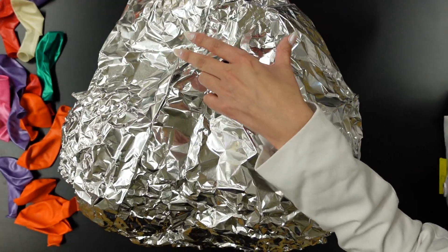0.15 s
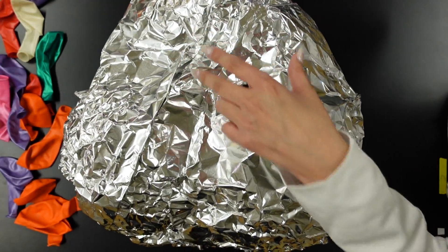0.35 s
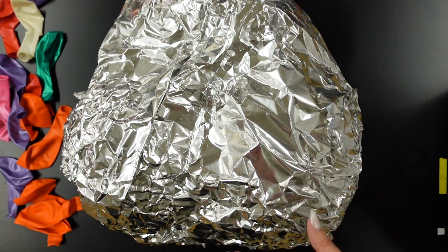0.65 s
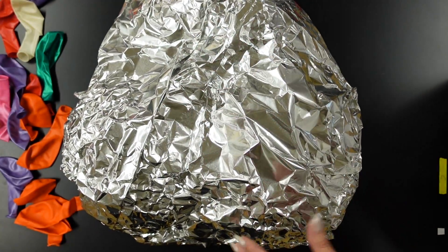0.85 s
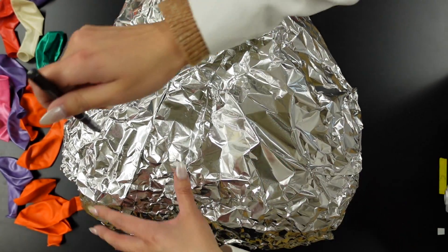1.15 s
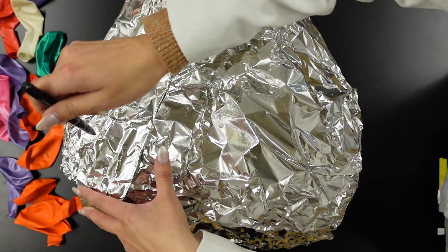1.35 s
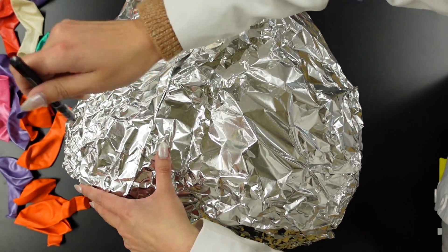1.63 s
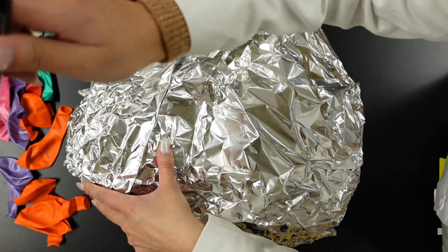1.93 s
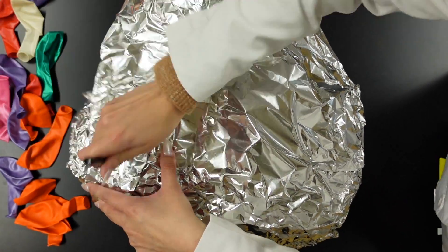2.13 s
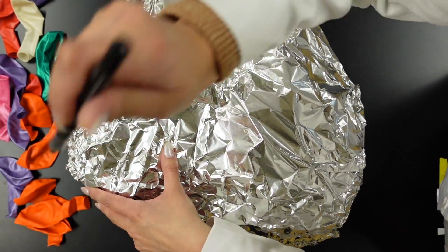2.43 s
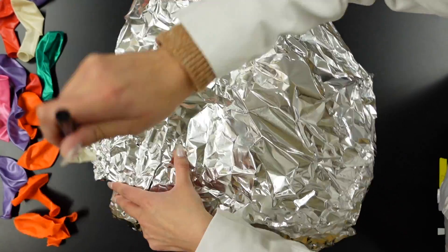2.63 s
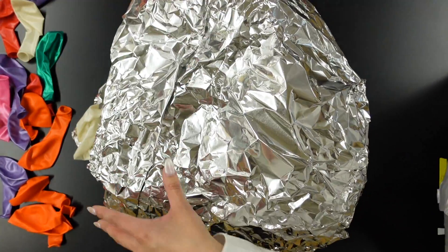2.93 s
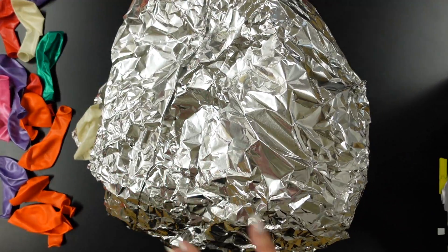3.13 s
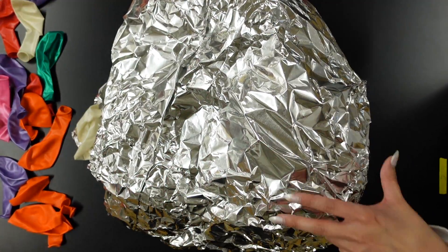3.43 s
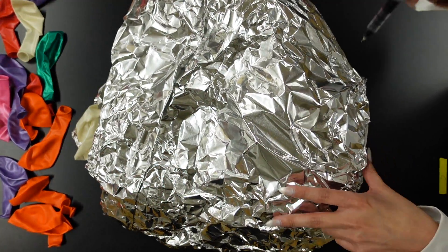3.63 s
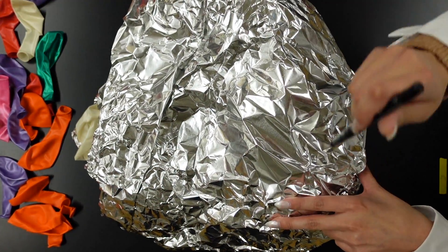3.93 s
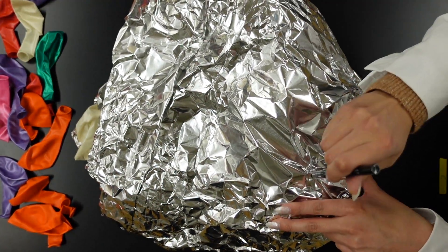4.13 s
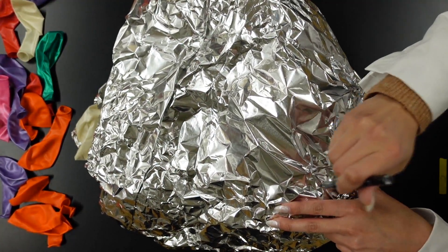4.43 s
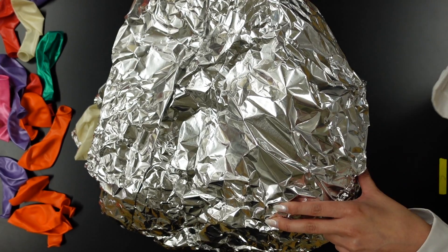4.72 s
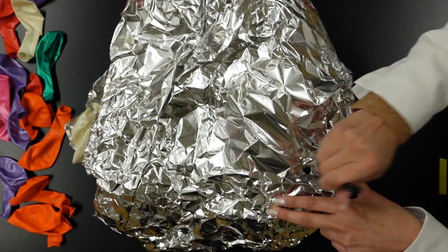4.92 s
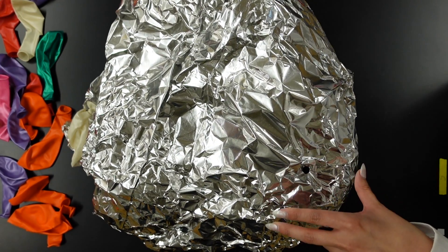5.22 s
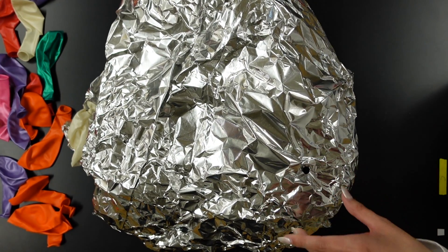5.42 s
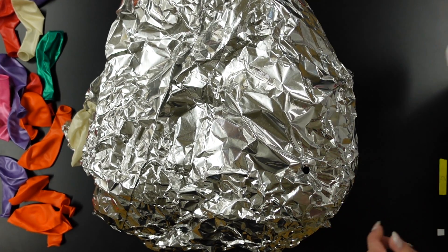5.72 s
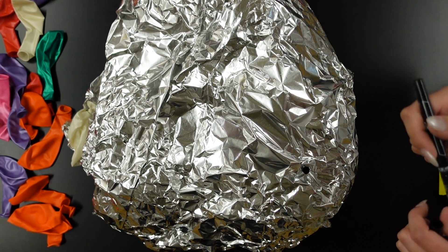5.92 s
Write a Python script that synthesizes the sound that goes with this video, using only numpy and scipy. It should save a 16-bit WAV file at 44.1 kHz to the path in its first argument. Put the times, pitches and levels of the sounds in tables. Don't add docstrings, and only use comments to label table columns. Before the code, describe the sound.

Balloons inside a crumpled foil shell burst in sharp, overloaded bangs with hollow air booms, while hands rustle and snap the foil in a small room.

```python
import sys
import numpy as np
from scipy import signal
from scipy.io import wavfile
from scipy.ndimage import uniform_filter1d

SR = 44100
rng = np.random.default_rng(int(sys.argv[2]) if len(sys.argv) > 2 else 0)


def linear_from_db(decibels):
    return 10 ** (np.asarray(decibels, float) / 20)


def wav_record(signal):
    frames = np.transpose(np.atleast_2d(signal))
    bounded = np.clip(frames, -1, 1)
    quanta = np.round(bounded * 32767).astype(np.int16)
    wavfile.write(sys.argv[1], SR, quanta)


N = 267510
STEP = 16

# start_s, level_db, slap_hz, length_s, limiter_dip_db
BURSTS = [(2.1708, -8, 1350, .0035, 0), (2.1742, -6, 600, .003, 14), (2.2313, -11, 560, .003, 1),
          (2.5613, -7, 520, .003, 3), (2.5645, -10, 1500, .004, 4), (2.5878, -3, 520, .0022, 4),
          (2.6018, -3, 330, .003, 4), (4.8826, -14, 900, .0025, 0), (4.8848, -4, 700, .0015, 7),
          (4.895, -5, 800, .0025, 0), (4.8978, -6, 420, .0035, 12)]
# start_s, hold_s, foil_db, boom_db, fall_db_per_s
RUSHES = [
    (-.13, 0.16, -22.5, -16, 215),
    (0.002, 0.004, -44, -16, 603),
    (2.172, 0.05, -18, -18, 168),
    (2.598, 0.23, -20.5, -14, 205),
    (4.886, 0.24, -21.5, -12.5, 174),
]
# frequency_hz, level_db (per Hz)
FOIL_COLOUR = [(350, -14), (600, 1.5), (643, -7.5), (709, -10), (770, -13.5), (1090, -7), (4070, -15.5),
               (5910, -18.5), (7700, -14.5), (9740, -24.5), (15000, -25.5), (15800, -48.5), (16500, -53)]


def evened(x):
    return x / np.sqrt(np.mean(x ** 2) + 1e-20)


def read(points, hz):
    f, value = np.transpose(points)
    return np.interp(np.log(hz + 1), np.log(f + 1), value)


def coloured(x, points):
    hz = np.abs(np.fft.fftfreq(8192, 1 / SR))
    log_gain = np.log(linear_from_db(np.maximum(read(points, hz), -100)))
    taps = np.fft.ifft(np.exp(np.conj(signal.hilbert(log_gain)))).real[:4096]
    return evened(signal.oaconvolve(x, taps)[:len(x)])


def band(x, lo_hz, hi_hz, order=2):
    sos = signal.butter(order, [lo_hz, min(hi_hz, .45 * SR)], "band", fs=SR, output="sos")
    return signal.sosfilt(sos, x)


def resonate(x, hz, width_hz):
    turn = np.exp(2j * np.pi * np.cumsum(hz * np.ones(len(x))) / SR)
    r = np.exp(-np.pi * width_hz / SR)
    return 2 * (turn * signal.lfilter([1 - r], [1, -r], x / turn)).real


def resonate_twice(x, hz, width_hz):
    return evened(resonate(resonate(x, hz, width_hz), hz, width_hz))


def add(mix, s, sound):
    part = mix[round(s * SR):][:len(sound)]
    part += sound[:len(part)]


def summed(levels_db):
    gain = np.sqrt(sum(linear_from_db(2 * db) for db in levels_db))
    return np.interp(np.arange(N), np.arange(0, N, STEP), gain)


def bursts():
    tear_db, tear_hz = -12.5, 800
    out, t = np.zeros(N), np.arange(2000) / SR
    noise = rng.standard_normal((len(BURSTS), 2, len(t)))
    for (s, db, hz, length, _), (a, b) in zip(BURSTS, noise):
        glide = (1.15 - 0.37 * t / length).clip(.5)
        wander = 1 + 0.41 * evened(uniform_filter1d(a, 30))
        slap = -np.sin(2 * np.pi * np.cumsum(hz * glide * wander) / SR)
        tear = linear_from_db(tear_db - db) * min(hz / tear_hz, 1) * coloured(b, FOIL_COLOUR) * np.exp(-t / (2 * length))
        add(out, s, linear_from_db(db) * (slap + tear) * np.exp(-np.maximum(t - length, 0) / .001))
    return band(out, 130, 17000, order=1)


def limiter_dip():
    t, dip_db = np.arange(N) / SR, np.zeros(N)
    for s, _, _, length, depth_db in BURSTS:
        since = t - s - length
        dip_db = np.maximum(dip_db, depth_db * np.exp(-since.clip(0) / .016) * (since > 0))
    return linear_from_db(-dip_db)


def rush(s, hold_s, fall_db_per_s):
    swell_db, swell_s = -3.5, 0.088
    since, knee = np.arange(0, N, STEP) / SR - s, 0.23 * hold_s
    swell = swell_db * np.exp(-since.clip(0) / swell_s)
    fall = fall_db_per_s * knee * np.logaddexp(0, (since - hold_s) / knee)
    return np.where(since >= 0, swell - fall, -150)


def boom():
    # frequency_hz, level_db (per Hz)
    deep_colour = [(41, -30), (70, -27.5), (92, -26), (249, 1.5), (332, 2.5), (399, 4.5), (648, -19.5),
                   (692, -9), (749, -8.5), (1220, -31.5), (1600, -20.5), (2080, -36.5), (3520, -120)]
    # frequency_hz, level_db (per Hz)
    touch_colour = [(150, -38.5), (230, -18), (330, -8.5), (450, 9.5), (600, 6), (800, 1), (1100, -30.5),
                    (1800, -45.5)]
    boom_hold, boom_fall = 0.79, 0.88
    touch_db, touch_per_db, touch_per_bright = -8, 0.17, -0.57
    ring_hz, ring_width_hz, ring_db, ring_fall_db_per_s = 549, 72, -18, 90

    lumps = crackle(280, 2.6, 0.02, 0.6)
    airs = []
    for s, hold, _, db, fall in RUSHES:
        depth = np.clip(0.48 + 1.61 * hold, .01, .99)
        airs.append((db + rush(s, boom_hold * hold, boom_fall * fall), depth))
    deep = summed(level + 20 * np.log10(depth) for level, depth in airs)

    light_levels = [level + 10 * np.log10(1 - depth ** 2) for level, depth in airs]
    for level, db, bright_db in presses():
        touch = touch_db + touch_per_db * (db + 31.5) + touch_per_bright * (bright_db + 9)
        light_levels.append(level + touch)
    light = summed(light_levels)

    ring = summed(db + ring_db + rush(s, boom_hold * hold, ring_fall_db_per_s)
                  for s, hold, _, db, _ in RUSHES)
    hollow = resonate_twice(lumps, ring_hz, ring_width_hz)
    return deep * coloured(lumps, deep_colour) + light * coloured(lumps[::-1], touch_colour) + ring * hollow


def crackle(per_s, spread_db, smear_s, hiss):
    size = linear_from_db(spread_db * np.minimum(rng.exponential(1, N), 5)) * (rng.random(N) < per_s / SR)
    smear = np.sqrt(signal.lfilter([1], [1, -np.exp(-1 / (smear_s * SR))], size ** 2))
    return (evened(smear) + hiss) * rng.standard_normal(N)


def patches(count):
    cracks_per_s = 1500
    pitches = np.geomspace(800, 15000, count) * rng.uniform(0.98, 1.05, count)
    rings = (band(crackle(cracks_per_s / count, 4.2, .009, 0.85), .975 * hz, 1.025 * hz, order=1)
             for hz in pitches)
    return evened(sum(rings))


def gesture(s, rise_s, hold_s, sag_db_per_s, fall_db_per_s):
    rise_from_db = -37.5
    since = np.arange(0, N, STEP) / SR - s
    held = -sag_db_per_s * since.clip(0, hold_s) - fall_db_per_s * (since - hold_s).clip(0)
    return held + rise_from_db * (-since).clip(0) / max(rise_s, .002)


def presses():
    # full_s, rise_s, hold_s, level_db, brightness_db
    press_rows = [(0.277, 0.083, 0.19, -38.5, -3.5), (0.418, 0.0058, 0.1, -41.5, -6.5),
                  (0.648, 0.053, 0.012, -41, -14), (1.01, 0.26, 0.23, -60.5, -2.5),
                  (1.393, 0.023, 0.063, -50.5, 3), (1.415, 0.0033, 0.054, -40, -23),
                  (1.433, .015, .2, -43, -24), (1.496, .03, 0.033, -33.5, -18.5),
                  (1.567, .01, 0.065, -38, -26), (1.662, 0.0046, 0.074, -33, -9.5),
                  (1.783, 0.087, 0.08, -32, -5.5), (1.892, .005, 0.0069, -30.5, -12.5),
                  (1.984, 0.0092, 0.14, -41, -12.5), (2.15, 0.0059, 0.026, -41.5, -7),
                  (2.49, .02, 0.05, -55.5, -10), (2.54, 0.0035, 0.05, -22.5, -5),
                  (0.65, .02, 0.037, -58, -28), (3.022, 0.046, 0.032, -52, -24),
                  (3.576, 0.043, .2, -27, -4.5), (3.8, 0.046, .1, -33, -6.5),
                   (3.845, 0.022, 0.032, -42, -38), (3.928, 0.066, .05, -33, -10),
                   (3.991, .004, .02, -40.5, -6), (4.155, 0.15, .03, -44.5, -5.5),
                   (4.238, 0.18, .04, -45, -9), (4.39, 0.12, .03, -55, -32), (4.46, 0.08, .03, -46.5, -9),
                   (4.604, 0.09, .04, -50, -9.5), (4.72, .03, .05, -60, -9.5),
                   (4.807, 0.0096, .025, -37.5, -11.5), (5.178, 0.012, .08, -32, -12),
                   (5.35, 0.0098, .01, -54, -18), (5.395, 0.0073, .02, -44, -14.5)]
    sag_db_per_s, fall_db_per_s = 39, 291
    return [(db + gesture(s, rise, hold, sag_db_per_s, fall_db_per_s), db, bright_db)
            for s, rise, hold, db, bright_db in press_rows]


def foil():
    body_per_db = 0.52
    treble_fall = 1.04
    # low_hz, high_hz, press_db, press_db per dB of brightness, rush_db, fall ratio
    bands = [(690, 1500, -10, -0.28, -3, 1),
             (1500, 5000, 0, 0, 0, 1),
             (5000, 10000, 0, 1, -4.5, treble_fall),
             (10000, 17000, -7, 1.9, -14.5, treble_fall ** 2)]
    sheet = coloured(0.88 * evened(crackle(300, 1.0, 0.015, 0.89)) + patches(count=22), FOIL_COLOUR)
    hands, out = presses(), np.zeros(N)
    for lo_hz, hi_hz, base_db, per_bright, rush_db, faster in bands:
        per_db = body_per_db if lo_hz < 1000 else 0
        levels = [level + base_db + per_bright * bright_db + per_db * (db + 33.5)
                  for level, db, bright_db in hands]
        levels += [db + rush_db + rush(s, hold, faster * fall) for s, hold, db, _, fall in RUSHES]
        out += summed(levels) * evened(band(sheet, lo_hz, hi_hz, order=3))
    return out


def snaps():
    # start_s, peak_db, pitch_hz, broad_crack_share (0-1)
    snaps_single = [(.2239, -37.5, 7750, .7), (.2584, -28, 4100, 0.44), (.2733, -23, 4170, 0.4),
                    (.35, -28, 5740, 0.75), (.411, -18.5, 3800, 0.5), (.4494, -25.5, 2740, .3),
                    (.4758, -25.5, 3430, 0.42), (.6482, -33.5, 3400, 0.6), (1.4167, -18, 1380, 0.65),
                    (1.4563, -21, 2180, 0.7), (1.474, -11.5, 7500, 0.33), (1.502, -28, 1420, 0.95),
                    (1.5128, -18, 2050, .48), (1.559, -21.5, 2090, .6), (1.5888, -15.5, 1330, 0.84),
                    (1.6083, -23.5, 1300, 0.2), (1.6174, -9, 4430, 0.6), (1.6691, -21, 1350, 0.2),
                    (1.6828, -9.5, 3200, 0.72), (1.7589, -23.5, 2250, .03), (1.7943, -21, 1670, 1),
                    (1.8396, -16.5, 3950, 0.07), (1.8933, -14, 2200, 0.42), (1.938, -28, 1810, 0.77),
                    (1.9854, -24, 1470, 0.36), (2.024, -27.5, 2300, 0.31), (2.1365, -16, 3740, 0.39),
                    (2.484, -39, 2700, 0), (2.5416, -14, 1380, .4), (3.0215, -34, 1500, 0.1),
                    (3.1426, -42.5, 1346, 0.38), (3.5646, -20, 2060, 0.95), (3.5794, -11.5, 3000, 0.71),
                   (3.6496, -13.5, 1500, 0.46), (3.7, -10, 3030, 0.099), (3.7953, -16.5, 2120, 0.61),
                   (3.8292, -25, 3940, .1), (3.924, -18, 1430, 0.47), (3.9392, -16, 1510, 0.34),
                   (3.9925, -19.5, 6060, .03), (4.152, -34.5, 7800, 0.18), (4.3893, -38, 2470, 0.58),
                   (4.4303, -37, 5000, .03), (4.4533, -34, 2400, 0.54), (4.599, -34, 4440, 0.29),
                   (4.635, -35.5, 3030, .4), (4.808, -26.5, 1710, 0.68), (4.8827, -5.5, 4830, 0.86),
                   (5.1731, -9.5, 1210, 0.48), (5.2334, -16.5, 1730, .24), (5.2593, -24, 1840, .03),
                   (5.347, -31, 1710, .03), (5.3961, -23.5, 2210, 0.26)]
    # start_s, peak_db, pitch_hz, broad_crack_share (0-1)
    snaps_flung = [
        (.04, -20, 1810, 0.5),
        (0.086, -28, 5000, 0.5),
        (2.208, -15, 900, 0.1),
        (2.24, -16, 8850, 0),
        (2.265, -22, 900, .3),
        (2.635, -9, 905, 0.85),
        (2.75, -10.5, 3500, 0.56),
        (2.84, -19.5, 9000, 0.75),
        (4.937, -15.5, 4000, .7),
    ]
    # start_s, peak_db, pitch_hz, broad_crack_share (0-1)
    snaps_broad = [(1.47, -24.5, 390, 0.07), (1.515, -25, 400, 0.1), (1.615, -29, 385, .03),
                   (3.65, -23, 720, .03), (3.69, -25, 760, .03), (3.76, -24, 780, .03),
                   (3.94, -20, 820, .03), (4.215, -35.5, 1570, .05), (4.256, -38.5, 1550, 0.1),
                   (4.39, -39, 844, 0.1), (4.815, -34, 620, .03)]
    ring_t60_s, rattle_t60_s = 0.049, .21
    out, t = np.zeros(N), np.arange(7000) / SR
    rows = snaps_single + snaps_flung + snaps_broad
    noise = rng.standard_normal((len(rows), len(t)))
    for (s, db, hz, broad), n in zip(rows, noise):
        broad = np.clip(broad, 0, 1)
        patch = resonate_twice(n, hz, .33 * hz)
        top_hz = 2 * hz + 17000 * broad ** 2
        crack = evened(band(coloured(n, FOIL_COLOUR), 0.8 * hz, top_hz))
        flip = 0.64 * np.exp(-t / .0015) * linear_from_db(min(db + 14, 0) / 2)
        rattle_db = -7 - 0.39 * (db + 20.5)
        shape = flip + linear_from_db(-60 * t / ring_t60_s) + linear_from_db(rattle_db - 60 * t / rattle_t60_s)
        rise_s = 0.0002 * linear_from_db(1.66 * max(-19 - db, 0))
        snap = ((1 - broad) * patch + broad * crack) * shape * np.minimum(t / rise_s, 1)
        add(out, s, linear_from_db(db - 8.5) * snap)
    return out


def table():
    # start_s, hold_s, thump_db, wobble_db
    rock = [(0.0, .05, -48, -48), (0.076, 0.12, -47.5, -69), (0.417, 0.072, -58.5, -75),
            (2.155, .06, -47, -42), (2.29, .2, -72, -45.5), (2.56, .02, -26, -41), (2.707, 0.11, -50, -40),
            (2.87, 0.31, -78.5, -48.5), (4.89, .02, -51.5, -46.5), (5.03, 0.11, -55, -57),
            (5.202, 0.085, -49, -61)]
    a, b = rng.standard_normal((2, N))
    moves = [(gesture(s, 0.013, hold, 0, 223), thump_db, wobble_db)
             for s, hold, thump_db, wobble_db in rock]
    thump = summed(m + db for m, db, _ in moves) * resonate_twice(a, 65, 24)
    wobble = summed(m + db for m, _, db in moves) * resonate_twice(b, 20, 20)
    return thump + wobble


def hush():
    # frequency_hz, level_db (per Hz)
    air_colour = [(12, -43.5), (20, 2), (43, -19), (65, -6.5), (195, -6.5), (218, -4.5), (440, -6.5),
                  (479, -10), (729, -9), (1140, -10), (1740, -19), (2510, -24), (8650, -25.5), (14300, -37),
                  (16500, -58)]
    # time_s, level_db
    air_sway = [(0, 18), (.6, 13), (.9, 11), (1.1, 12.5), (1.35, 11), (3.0, 13), (3.4, 10), (4.299, 12),
                (5.5, 11), (6.1, 8)]
    # pitch_hz, width_hz, level_db
    machine = [
        (191.4, 16, -58),
        (283, 60, -60.5),
        (1240, 79, -71),
    ]
    air_db, treble_db = -67, -7
    air = linear_from_db(air_db) * coloured(rng.standard_normal(N), air_colour)
    air = air + (linear_from_db(treble_db) - 1) * band(air, 2900, 17000)
    sway = linear_from_db(np.interp(np.arange(N) / SR, *np.transpose(air_sway)))
    hum = sum(linear_from_db(db) * evened(resonate(rng.standard_normal(N), hz, w)) for hz, w, db in machine)
    return sway * air + hum


def scene():
    ducked = foil() + snaps() + boom() + table() + hush()
    return (ducked * limiter_dip() + bursts())[None]


def band_limit(x):
    return signal.sosfilt(signal.butter(12, 16800, fs=SR, output="sos"), x)


def record(dry):
    ceiling = .53
    clipped = dry / (1 + np.abs(dry / ceiling) ** 6) ** (1 / 6)
    mix = signal.sosfilt(signal.butter(12, 16300, fs=SR, output="sos"), clipped)
    return band_limit(mix)


dry = scene()
out = record(dry)
wav_record(out)
```